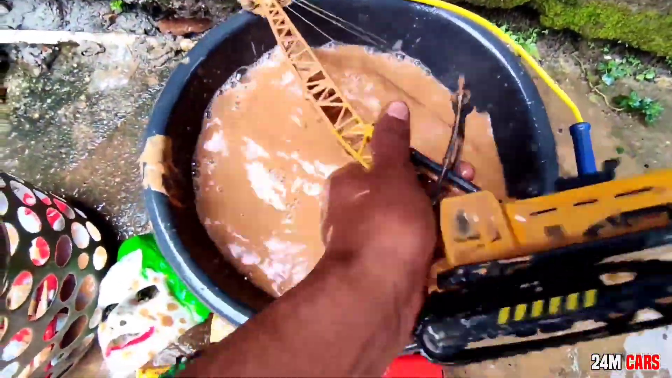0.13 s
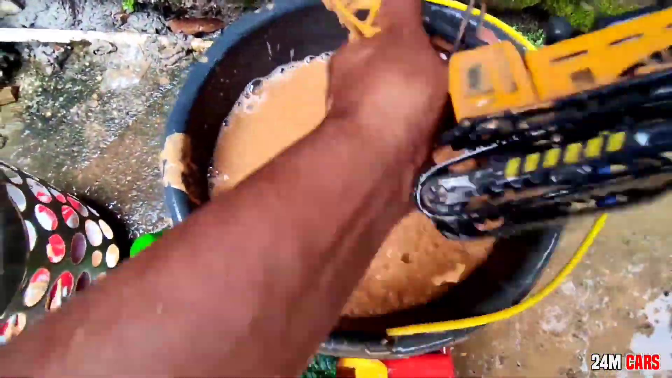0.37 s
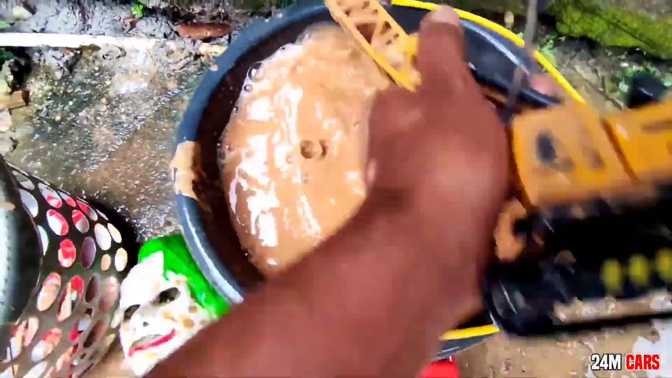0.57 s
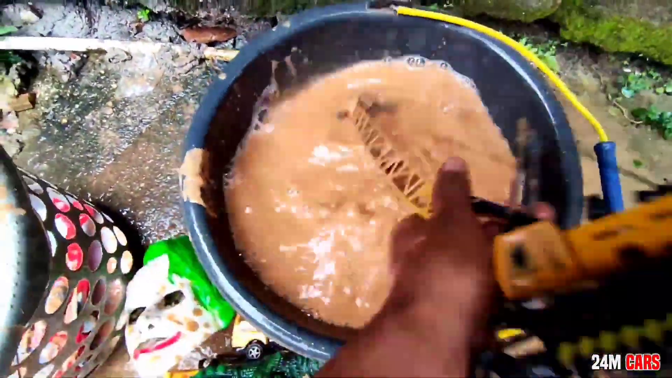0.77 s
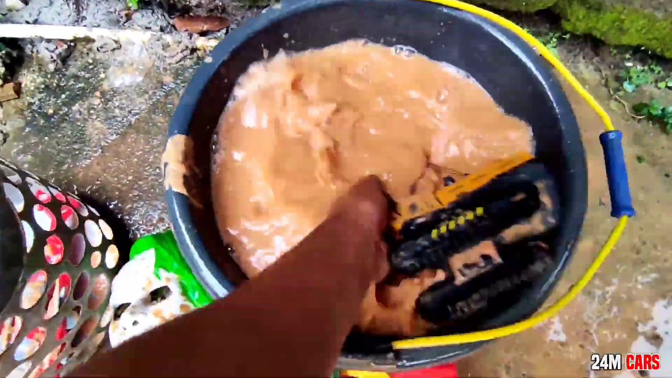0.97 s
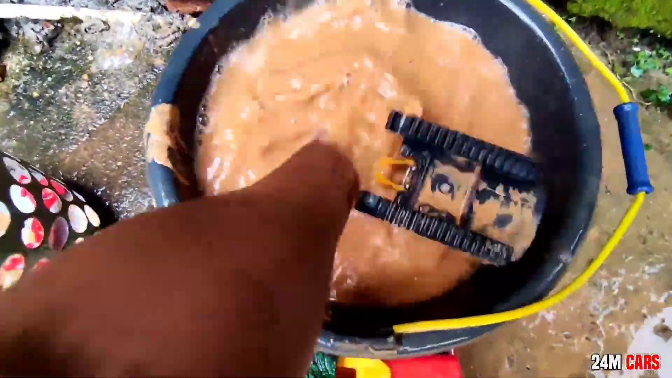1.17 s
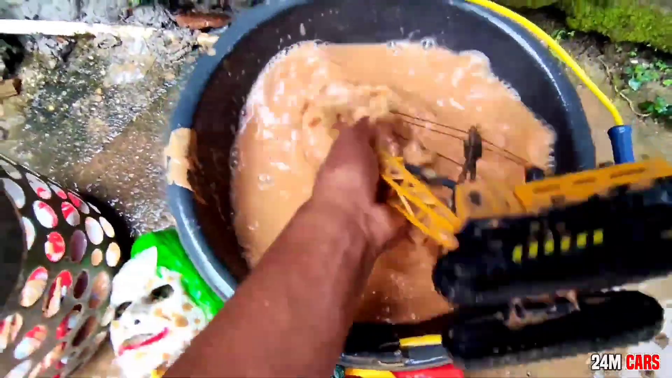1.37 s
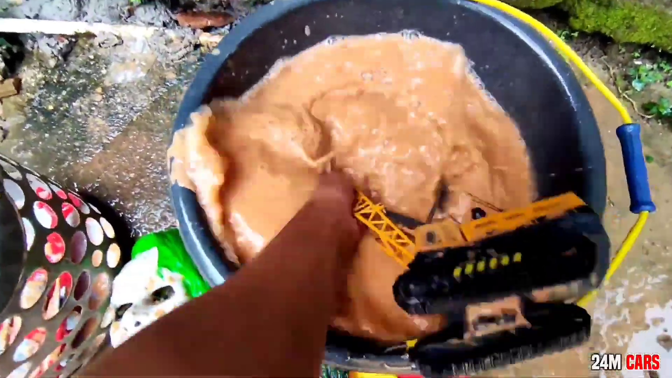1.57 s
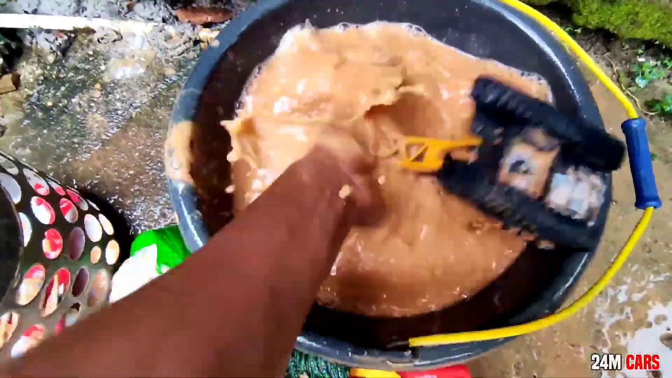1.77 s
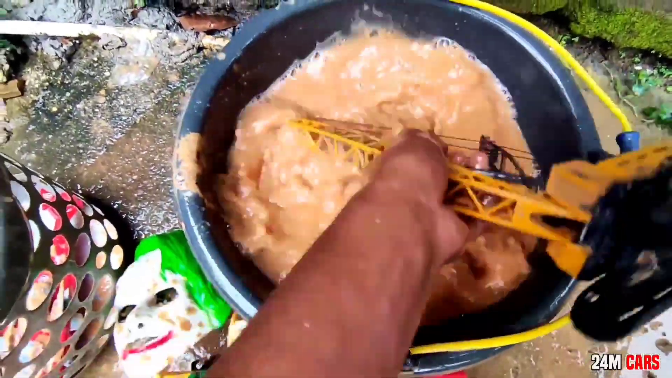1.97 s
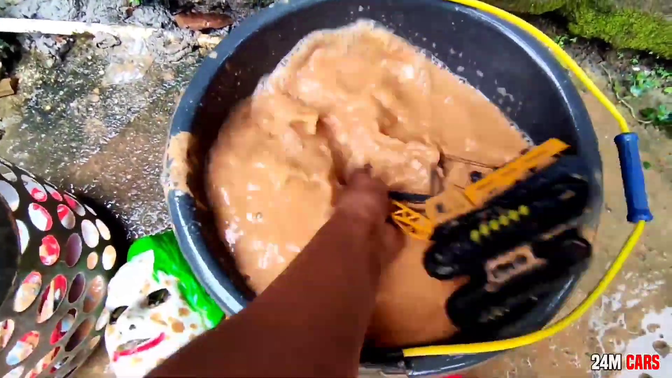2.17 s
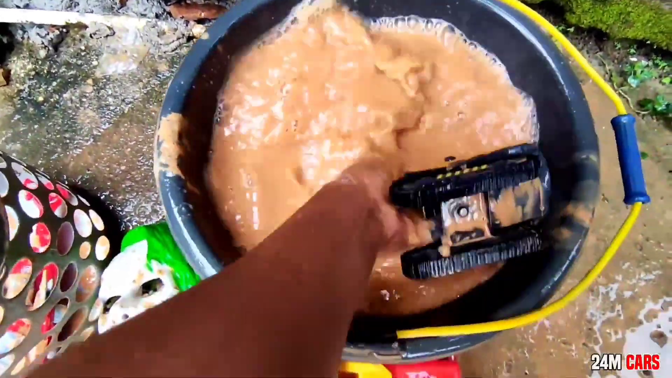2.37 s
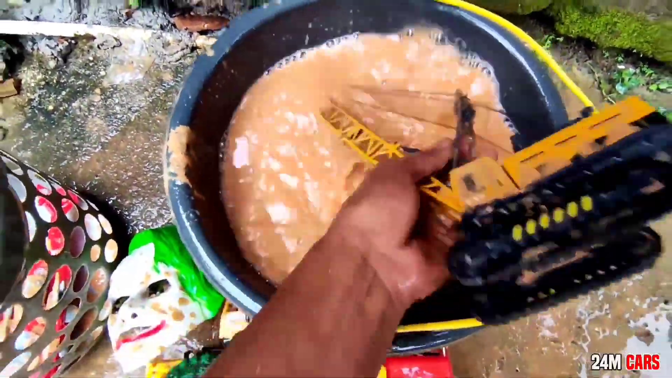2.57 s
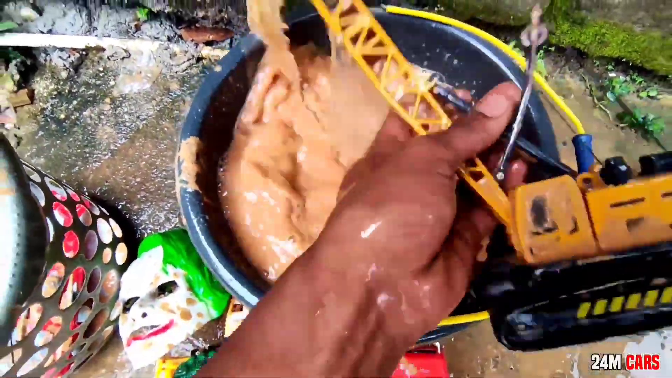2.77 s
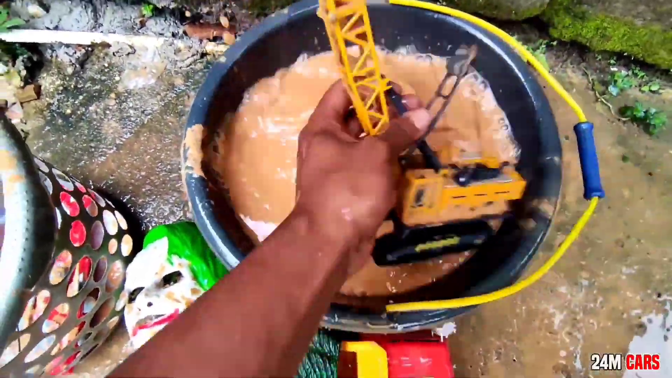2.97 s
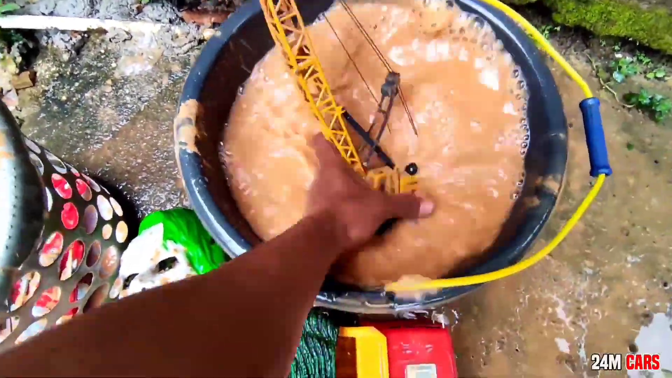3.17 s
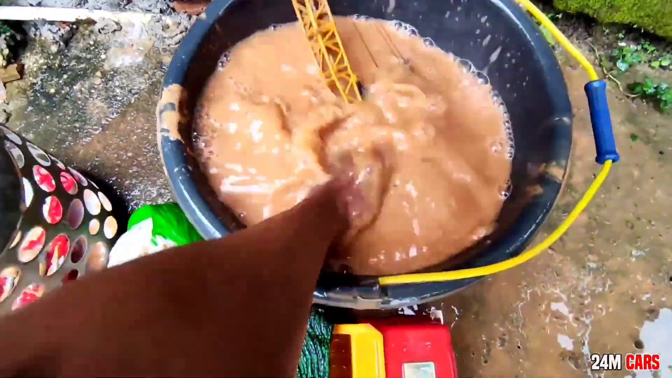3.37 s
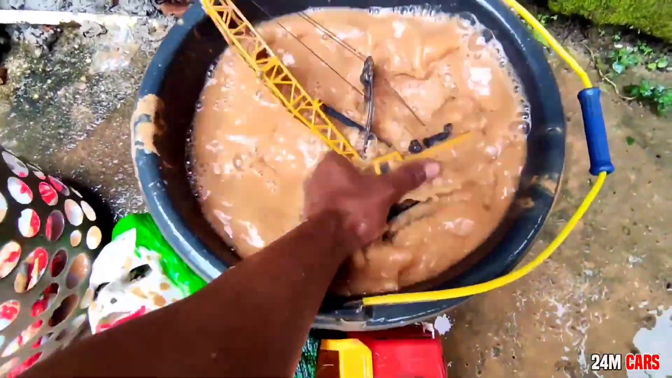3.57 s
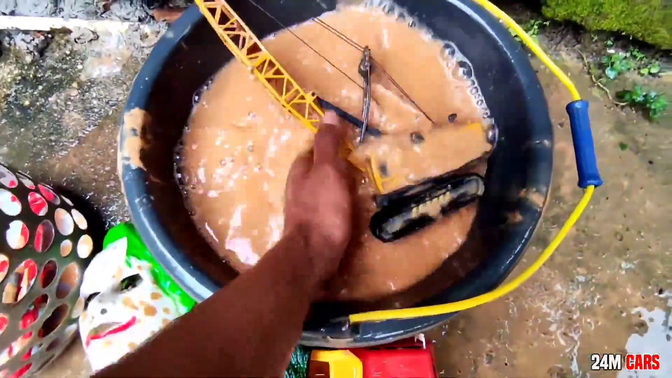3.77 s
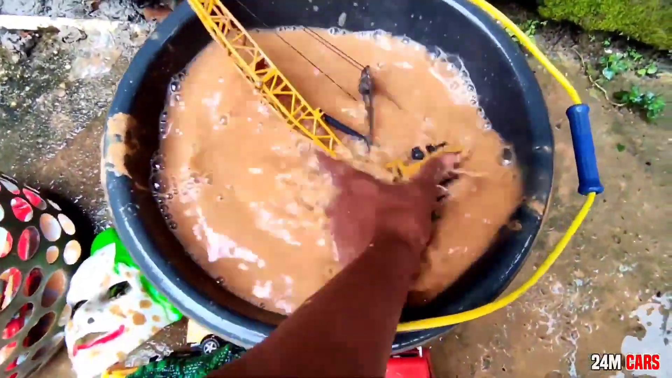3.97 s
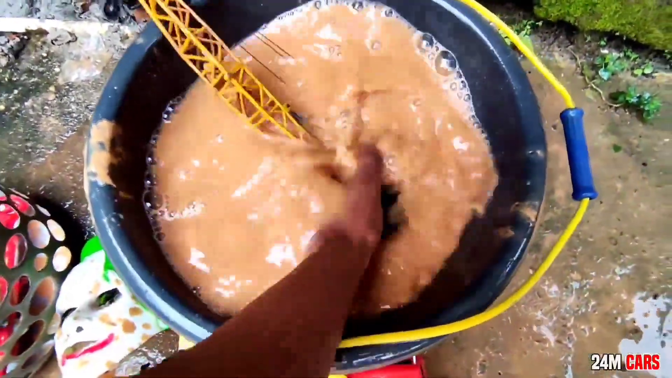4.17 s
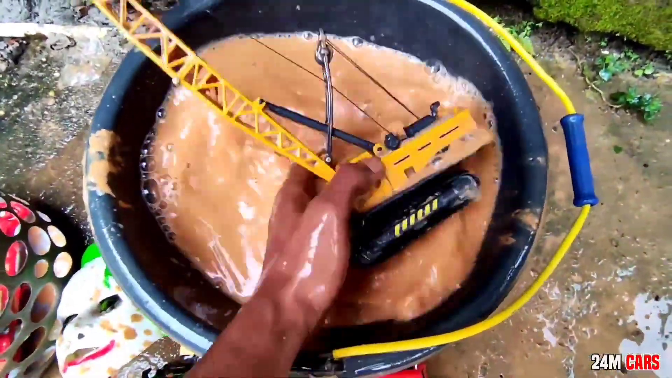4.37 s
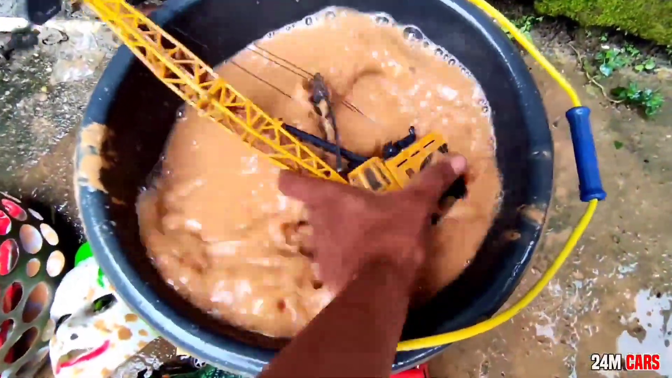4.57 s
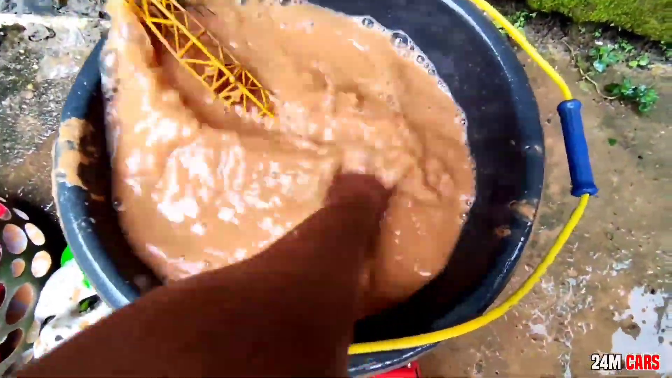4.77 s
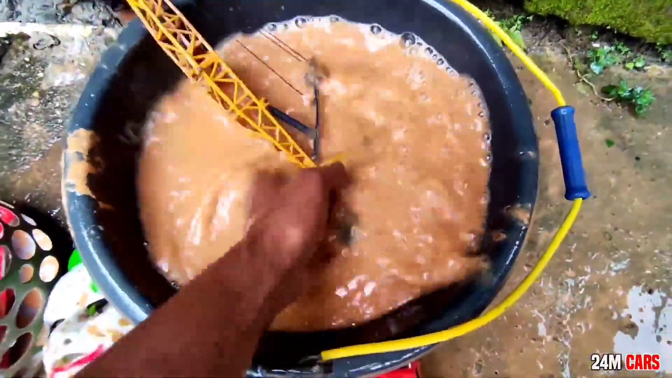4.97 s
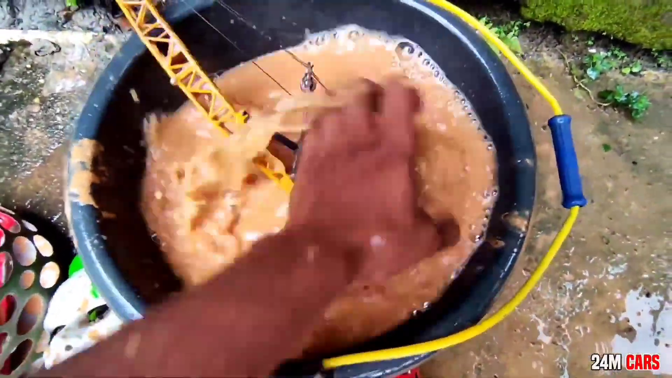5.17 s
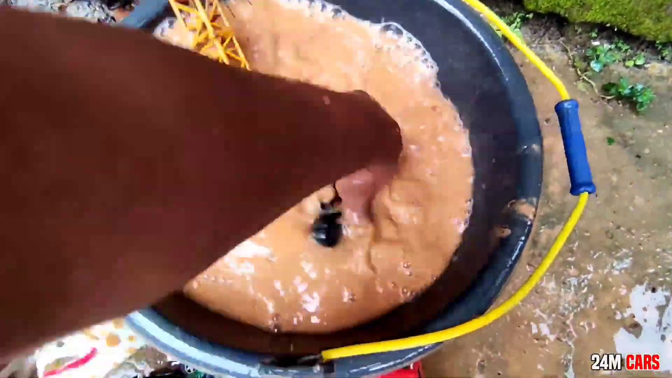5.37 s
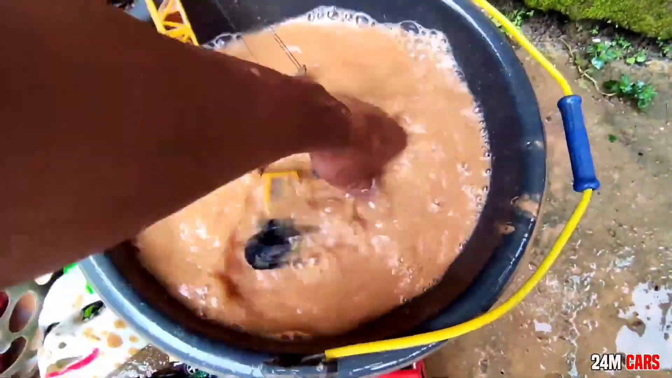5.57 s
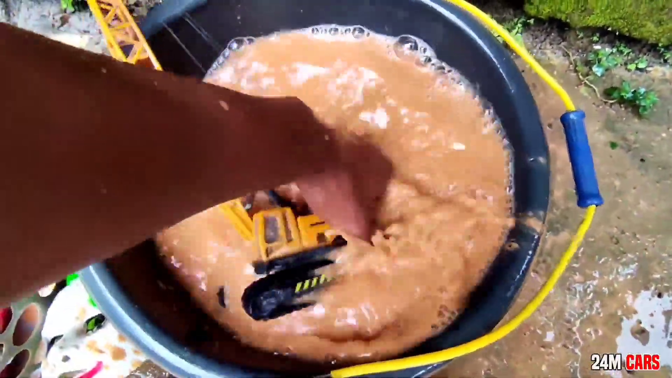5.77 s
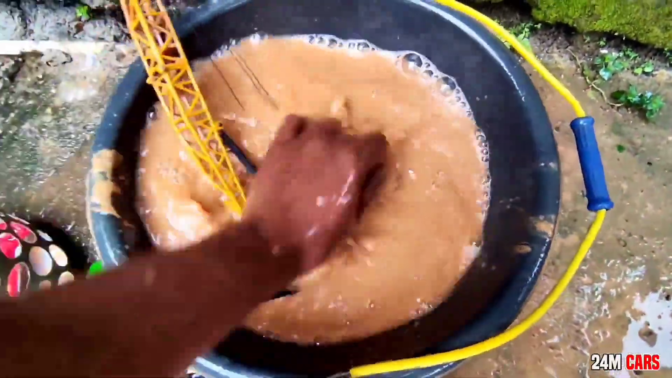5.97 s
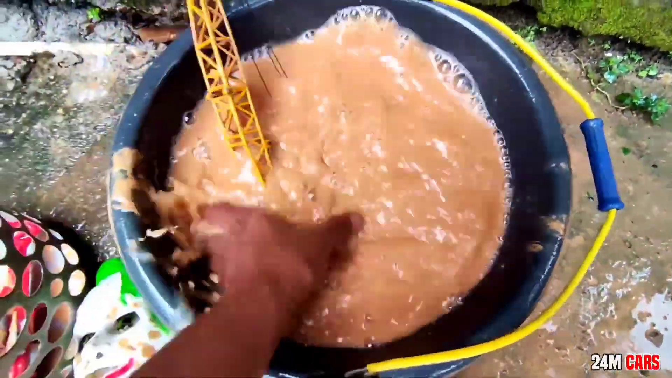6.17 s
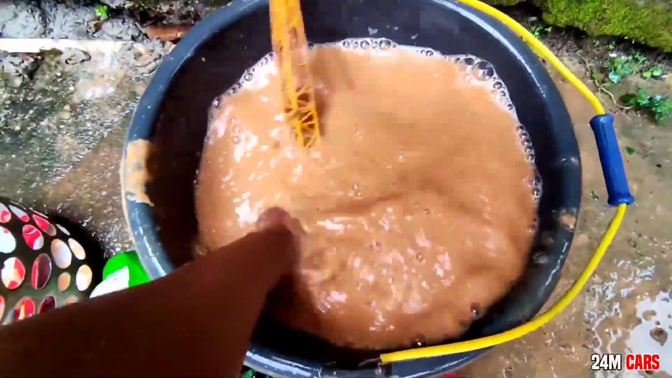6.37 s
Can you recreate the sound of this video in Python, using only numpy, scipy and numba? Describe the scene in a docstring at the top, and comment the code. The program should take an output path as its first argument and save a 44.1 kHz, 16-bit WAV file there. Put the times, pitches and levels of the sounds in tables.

```python
"""Faint sloshing and spray open over a distant rumble, as a hand swishes a plastic toy in a bucket of muddy water.
Knocks, plops, spits and slaps follow at once; singing bubbles come later. Two spaced microphones listen outdoors.
Bubbles and knocks are damped gliding sines; spray, slaps, slosh and distance are shaped stereo noise.
Surge envelopes drive the stirring; resonances and a short blur of noise add the bucket and its wet walls."""
import sys
import numpy as np
from scipy import signal
from scipy.fft import rfft, irfft, next_fast_len
from scipy.io import wavfile
from scipy.ndimage import uniform_filter1d, map_coordinates
from numba import njit

SR = 44100
rng = np.random.default_rng(int(sys.argv[2]) if len(sys.argv) > 2 else 0)


def materialize(psi):
    """Save the field psi as 16-bit PCM at rate SR to the path in sys.argv[1].

    A 1-D psi becomes a single channel; in a 2-D psi each row is a channel.
    """
    bounded = np.clip(np.atleast_2d(psi).T, -1, 1)
    quanta = np.round(bounded * 32767).astype(np.int16)
    wavfile.write(sys.argv[1], SR, quanta)


N = 283430  # length in samples


def amp(db):
    """Gain of a level in dB."""
    return 10 ** (np.asarray(db) / 20)


def unit(x):
    """Bring x to rms 1."""
    return x / np.sqrt(np.mean(x ** 2) + 1e-20)


def along(points, hz):
    """Read a curve of (Hz, value) points on a log frequency axis."""
    point_hz, value = np.transpose(points)
    return np.interp(np.log(hz + 1), np.log(point_hz + 1), value)


def curves(rows):
    """One value per sample for each column after the time."""
    time_s, *columns = np.transpose(rows)
    return [np.interp(np.arange(N) / SR, time_s, column) for column in columns]


def wobble(rate):
    """A smooth random curve with this many knots a second."""
    knots = rng.standard_normal(int(N * rate / SR) + 4)
    return map_coordinates(knots, [np.arange(N) * rate / SR])


def filtered(x, response):
    """Filter x by a response given as a function of frequency."""
    m = next_fast_len(N + SR // 2)
    return irfft(rfft(x, m) * response(np.fft.rfftfreq(m, 1 / SR)), m)[..., :N]


def rush(spectrum, alike, patchy_db):
    """Stereo noise of rms 1, with patches of random gain over time and frequency."""
    z = signal.stft(rng.standard_normal((2, N)), nperseg=256)[2]
    field = uniform_filter1d(rng.standard_normal(z.shape[1:]), size=5, axis=0)
    field = uniform_filter1d(field, size=9, axis=1)
    pair = signal.istft(z * amp(patchy_db * unit(field)), nperseg=256)[1][:, :N]

    def mid_side_response(hz):
        # this angle shares power between mid and side to give the wanted left-right likeness
        angle = np.arccos(np.clip(along(alike, hz), -1, 1)) / 2
        return amp(along(spectrum, hz)) * [np.cos(angle), np.sin(angle)]

    mid, side = filtered(pair, mid_side_response)
    return unit(np.array([mid + side, mid - side]))


@njit
def add(out, s, hz, cycles, gain, lag, rise, attack):
    """Add damped sines, 60 dB down at their end, whose pitch glides; each reaches the left lag seconds late."""
    for i in range(len(s)):
        life = cycles[i] / hz[i]
        for c in range(2):
            start = (s[i] + lag[i] * (.5 - c)) * SR
            for k in range(max(int(start) + 1, 0), min(int(start + life * SR), out.shape[1])):
                u = (k - start) / SR / life  # 0 to 1 over the life of the note
                shape = 10 ** (-3 * u) * (1 - np.exp(-u / attack)) ** 2
                out[c, k] += gain[c, i] * shape * np.sin(2 * np.pi * cycles[i] * u * (1 + rise[i] * u))


def bubbles(s, hz, cycles, db, rise, attack, spread_s, spread_db):
    """Bubbles scattered over the water, each with its own delay and balance between the microphones."""
    out = np.zeros((2, N))
    lag, pan = rng.standard_normal((len(s), 2)).T
    gain = amp(db + np.outer([.5, -.5], spread_db * pan))
    hz, cycles = np.clip(hz, 80, SR / 2.2), np.maximum(cycles, .5)
    add(out, s, hz, cycles, gain, .0001 + spread_s * lag, rise + 0 * s, max(attack, .002))
    return out


def swarm(count, centre_hz, octaves, cycles, scatter_db, clump_db, rise):
    """A random crowd of bubbles of rms 1, of unequal size, coming in clumps."""
    place, g = rng.random(count), rng.standard_normal((count, 4))
    db = scatter_db * g[:, 2] + clump_db * wobble(35)[(place * N).astype(int)]
    hz = centre_hz * 2 ** (octaves * np.clip(g[:, 0], -1.5, 3))
    life_cycles = cycles * 2 ** (0.64 * g[:, 1])
    crowd = bubbles(place * N / SR, hz, life_cycles, db, rise * (1 + g[:, 3]),
                    attack=0.037, spread_s=0.00018, spread_db=3.0)
    return unit(crowd)


def bursts(s, db, t60, attack_s):
    """Envelope of noise bursts that leap up and die away."""
    out, t = np.zeros(N + SR), np.arange(SR // 4) / SR
    for at, level, decay in zip(s, db, t60):
        fall = amp(level - 60 * t / max(decay, .003))
        out[round(at * SR):][:len(t)] += fall * (1 - np.exp(-t / attack_s)) ** 2
    return out[:N]


# Slow stirring between the surges. Each row: time in seconds, slosh gain in dB, spray gain in dB.
STIR_BED = [(0, -39, -42), (0.3, -46, -64), (0.47, -50, -53), (0.88, -60, -49), (1.3, -41.5, -43.5),
            (2.0, -38, -48), (2.6, -41, -47), (3.1, -54.5, -46.5), (3.5, -45, -62), (3.93, -54.5, -47.5),
            (4.4, -42.5, -45.5), (5.07, -43, -49), (5.32, -54, -55), (5.69, -43, -60), (5.9, -44.5, -38),
            (6.43, -38, -46.5)]
# Surges of water pushed by the hand. Each row: crest in seconds, length in seconds,
# slosh gain at the crest in dB, spray gain at the crest in dB.
SURGES = [(0.12, 0.43, -39.5, -32.5), (0.184, 0.088, -45, -27.5), (0.25, 0.096, -36, -27),
          (0.56, 0.34, -46, -40), (0.944, 0.072, -33.5, -32.5), (1.014, 0.078, -36, -22),
          (1.058, 0.19, -19.5, -23), (1.109, 0.11, -23, -43), (1.157, 0.085, -22, -42),
          (1.172, 0.09, -18.5, -22.5), (1.329, 0.084, -34.5, -64), (1.593, 0.15, -28, -26),
          (1.672, 0.032, -24, -45), (1.752, 0.056, -52, -19), (1.815, 0.032, -20.5, -38),
          (1.977, 0.14, -45, -26.5), (2.183, 0.59, -28, -35.5), (2.224, 0.071, -20.5, -25),
          (2.292, 0.089, -25.5, -36), (2.37, 0.14, -28, -23), (2.527, 0.059, -50, -34),
          (2.65, 0.13, -37, -35), (2.746, 0.15, -38, -34.5), (2.916, 0.36, -46, -38.5),
          (3.204, 0.095, -39, -22), (3.233, 0.18, -27.5, -21), (3.333, 0.17, -26, -20.5),
          (3.41, 0.11, -27.5, -50), (3.6, 0.48, -35.5, -37.5), (3.857, 0.11, -38, -41),
          (4.124, 0.22, -33.5, -35), (4.598, 0.06, -33.5, -31.5), (4.679, 0.12, -53, -28),
          (4.748, 0.17, -22.5, -23), (5.19, 0.14, -43.5, -28.5), (5.224, 0.083, -47, -43),
          (5.389, 0.18, -56, -27.5), (5.454, 0.23, -31, -36.5), (5.604, 0.089, -35, -34),
          (5.728, 0.052, -38, -38), (5.817, 0.045, -51, -37), (5.932, 0.044, -29, -41),
          (5.995, 0.14, -34.5, -30), (6.133, 0.042, -48, -25), (6.287, 0.088, -32.5, -21),
          (6.358, 0.084, -50, -23)]
SURGE_FALL_DB = 15.5  # a surge starts and ends this far under its crest
SURGE_RISE_SHARE = 0.4  # share of its length spent rising


def stirring():
    """Gains of slosh and spray: surges climb to a crest and ebb, their power adding to the slow stirring."""
    t = np.arange(N)[::32] / SR
    power = amp(2 * np.array(curves(STIR_BED))[:, ::32])
    for s, length, slosh_db, spray_db in SURGES:
        u = (t - s) / max(length, .02)
        away = np.where(u < 0, -u / SURGE_RISE_SHARE, u / (1 - SURGE_RISE_SHARE))
        power = power + np.outer(amp([2 * slosh_db, 2 * spray_db]), amp(-2 * SURGE_FALL_DB * away))
    return [np.interp(np.arange(N) / SR, t, np.sqrt(p)) for p in power]


# Colour of the sloshing water, also used by the slaps. Each row: frequency in Hz, relative level in dB per Hz.
SLOSH = [(88, -57), (150, 3), (182, -65), (243, -0.5), (333, -10), (426, 4), (569, -23), (699, 2),
         (2250, -10), (4000, -12.5), (5200, -26), (8800, -120)]
# Colour of the spray, also used by the spits. Each row: frequency in Hz, relative level in dB per Hz.
SPRAY = [(880, -29), (1500, -1.5), (2230, -15.5), (3220, -3), (4200, -3), (7170, -7.5), (8740, -2.5),
         (10000, -6.5), (12000, -5.5), (14800, -10.5), (16000, -24)]
# Stereo width of water and distant air. Each row: frequency in Hz, left-right likeness (1 is identical).
ALIKE = [(60, 0.95), (180, 1), (550, 0.99), (1650, 0.15), (4970, 0.015), (15000, 0.011)]


def churn():
    """Stirring makes gurgling bubbles on a slosh, and droplets of two sizes and short ticks on a spray."""
    slosh, spray = stirring()
    gurgle = swarm(count=5500, centre_hz=900, octaves=.8, cycles=14, scatter_db=3.5, clump_db=4, rise=0.2)
    drops = swarm(count=5000, centre_hz=3060, octaves=0.492, cycles=60,
                  scatter_db=3.5, clump_db=3.5, rise=0.044)
    fizz = swarm(count=7000, centre_hz=8130, octaves=0.56, cycles=30,
                 scatter_db=10.5, clump_db=9.0, rise=0.016)
    ticks = swarm(count=2500, centre_hz=3500, octaves=.9, cycles=8, scatter_db=4, clump_db=4, rise=0.05)
    wash = amp(1.5 * wobble(30)) * rush(SLOSH, ALIKE, patchy_db=4)
    hiss = amp(-4.5 + 3.8 * wobble(75)) * rush(SPRAY, ALIKE, patchy_db=3.5)
    low = amp(-3.5) * gurgle + amp(-5.5) * wash
    high = amp(-7.5) * drops + amp(-8.5) * fizz + amp(-10.0) * ticks + hiss
    return slosh * low + spray * high


# Swell of the distant rumble. Each row: time in seconds, level in dB before a random swell.
RUMBLE = [(0, -48), (1.5, -46), (3.5, -45.5), (5.35, -48), (5.55, -43.5), (5.95, -43.5), (6.43, -50)]
# Colour of the rumble. Each row: frequency in Hz, relative level in dB per Hz.
DRONE = [(15, -52), (25, -20), (97, 4), (182, -9.5), (241, -5.5), (300, -17), (390, -6), (660, -120)]
# Stereo width of the rumble. Each row: frequency in Hz, left-right likeness (1 is identical).
RUMBLE_ALIKE = [(30, .75), (70, .62), (150, .8)]
# Colour of the distant air. Each row: frequency in Hz, relative level in dB per Hz.
FAR = [(88, -21), (150, 3), (702, -15.5), (1100, -40), (4320, -20), (7180, -24), (8730, -13.5),
       (13400, -17), (16000, -21)]


def distance():
    """Low rumble and broad air from far off, each noise with a slow random swell."""
    swell_db = 1.5 * wobble(6)
    rumble = amp(curves(RUMBLE)[0] + swell_db) * rush(DRONE, RUMBLE_ALIKE, patchy_db=1.5)
    air = amp(-51.5 + 0.4 * wobble(1.87)) * rush(FAR, ALIKE, patchy_db=4.5)
    return rumble + air


# Resonances of the air space and wall. Each row: centre in Hz, width in Hz, relative peak gain in dB.
BUCKET = [(245, 40, 8), (430, 70, -3), (700, 80, -2.5), (950, 120, -8), (1420, 200, -7)]


def bucket(x):
    """The air above the water and the plastic wall ring on as damped resonances of alternating polarity."""
    def resonances(f):
        total = 0
        for k, (centre, width, db) in enumerate(BUCKET):
            mode = 1j * f * width / (centre * centre - f * f + 1j * f * width)
            total = total + (-1) ** k * amp(db) * mode
        return total

    return filtered(x, resonances)


def echoes(x, t60):
    """Sound bounces round the wet walls: a dense short blur that differs a little at each microphone."""
    t = np.arange(SR // 8) / SR
    common, own = rng.standard_normal(len(t)), rng.standard_normal((2, len(t)))
    tail = (common + 0.5 * own) * amp(-60 * t / max(t60, .01)) * (t > .0015)
    return signal.fftconvolve(x, tail / np.linalg.norm(tail[0]), axes=1)[:, :N]


# The toy knocking the wall and flat slaps. Each row: start in seconds, level in dB before the layer trims,
# first pitch in Hz, cycles at that pitch until 60 dB down.
KNOCKS = [(0.056, -19.5, 790, 6.3), (0.121, -22, 700, 6.2), (0.182, -22.5, 600, 3.8), (0.4821, 2, 987, 12),
          (1.0301, -11.5, 690, 12), (1.0798, 2, 906, 10.4), (1.145, -8, 1100, 9), (1.1615, -5, 760, 13),
          (1.5922, 5, 1050, 5.3), (1.671, -7, 970, 10.5), (1.796, -11.5, 940, 13),
          (1.9165, -5.5, 1005, 9.8), (2.146, -4, 1140, 8.4), (2.2045, -19, 645, 6), (2.213, -17, 620, 4.8),
          (2.236, -19, 620, 5), (2.275, -15, 600, 6.2), (2.411, -9, 1040, 9.8), (3.224, -12.5, 1010, 13),
          (3.281, -21, 680, 13), (3.305, -14, 694, 12), (3.382, -11.5, 870, 16), (3.4601, -13, 866, 10),
          (4.716, -12.5, 900, 7.7), (4.0875, -13, 1160, 16), (5.7113, -10, 875, 26),
          (6.1267, -13.5, 900, 13)]
KNOCK_SAG = 0.14  # share by which the mean pitch lies under the first
KNOCK_BODY_DB, KNOCK_EDGE_DB = -18.5, -22  # trims of the duller body and brighter edge


def knocks():
    """A sudden blow that sags in pitch, with a duller body under it and a brighter edge."""
    s, db, hz, cycles = np.transpose(KNOCKS)
    g = rng.standard_normal((len(s), 2))
    blow = bubbles(s, hz, cycles, db + 2.0, -KNOCK_SAG, attack=0.024, spread_s=.00004, spread_db=0.5)
    body_hz = hz * (0.502 + 0.071 * g[:, 0])
    body = bubbles(s + 0.0019, body_hz, 1.14 * cycles, db + KNOCK_BODY_DB, -KNOCK_SAG,
                   attack=0.024, spread_s=.00004, spread_db=10.0)
    edge_hz = hz * (1.6 + .1 * np.clip(g[:, 1], -1, 1))
    edge = bubbles(s, edge_hz, 1.1 * cycles, db + KNOCK_EDGE_DB, -KNOCK_SAG,
                   attack=0.02, spread_s=.00008, spread_db=1.5)
    return blow + body + edge


# Trapped air pockets ringing. Each row: loudest moment in seconds, level in dB before trim and flicker,
# pitch in Hz averaged over the first third of the ring.
PLOPS = [(0.073, -29, 790), (0.09, -24.5, 1770), (0.182, -26.5, 2180), (0.21, -30, 376), (0.222, -28, 2170),
         (0.256, -29.5, 613), (0.297, -25.5, 1930), (0.433, -18.5, 2210), (0.491, -15.5, 920),
         (0.596, -26.5, 2430), (1.005, -14, 725), (1.09, -6, 615), (1.099, -15.5, 770), (1.11, -16.5, 2400),
         (1.094, -13.5, 263), (1.167, -12, 790), (1.196, -12.5, 734), (1.166, -17, 398),
         (1.162, -12.5, 1610), (1.421, -27, 570), (1.459, -23.5, 1570), (1.46, -15, 766),
         (1.529, -23.5, 1510), (1.597, -13, 395), (1.608, -12.5, 463), (1.619, -18, 786), (1.682, -18, 724),
         (1.737, -12, 1670), (1.817, -15, 480), (1.824, -5.5, 760), (1.824, -16.5, 1290),
         (1.831, -21.5, 394), (2.156, -17.5, 970), (2.226, -20.5, 780), (2.257, -19, 730),
         (2.268, -11.5, 1700), (2.293, -17, 2000), (2.157, -21.5, 267), (2.216, -20, 330),
         (2.277, -13, 1340), (2.412, -15, 1570), (2.412, -14, 2630), (2.415, -18, 703), (2.421, -27.5, 363),
         (2.574, -14.5, 2650), (2.647, -24, 672), (2.657, -30, 3900), (3.011, -29, 947), (3.162, -21, 653),
         (3.178, -14, 1330), (3.198, -17.5, 1190), (3.199, -9, 534), (3.288, -24, 1350), (3.291, -18, 1910),
         (3.329, -14, 2730), (3.231, -16, 2840), (3.308, -19.5, 435), (3.328, -20.5, 1780),
         (3.39, -17, 260), (3.462, -22, 1610), (3.467, -25, 275), (3.571, -28, 1950), (3.574, -16.5, 868),
         (3.611, -28, 1140), (3.968, -22, 4070), (4.076, -25.5, 726), (4.09, -9, 1440),
         (4.092, -13.5, 5200), (4.099, -16.5, 3320), (4.106, -23.5, 1490), (4.143, -24.5, 770),
         (4.149, -18.5, 3530), (4.185, -27.5, 740), (4.234, -28, 1270), (4.256, -23.5, 3400),
         (4.559, -31, 1700), (4.399, -20.5, 1472), (4.518, -17.5, 1176), (4.532, -24, 1740),
         (4.594, -23.5, 634), (4.675, -16, 1290), (4.772, -19.5, 427), (4.819, -23, 755), (4.82, -22, 1190),
         (4.832, -18.5, 2640), (5.284, -26, 1840), (5.394, -23.5, 754), (5.431, -25, 480),
         (5.442, -25.5, 1370), (5.454, -27.5, 626), (5.463, -25.5, 1560), (5.476, -28, 685),
         (5.71, -19, 435), (5.727, -27, 913), (5.75, -29, 846), (5.816, -26.5, 794), (5.914, -21, 1710),
         (5.974, -19, 2010), (6.005, -25, 1050), (6.022, -16, 1840), (6.136, -20, 1790), (6.357, -18, 1100),
         (6.382, -19.5, 1850)]
PLOP_CYCLES = 2.843 * 4.27  # cycles until 60 dB down, for a plop of 0 dB at 800 Hz
HALVING_DB = 14  # half as many cycles per this many dB harder
PITCH_POWER = 0.36  # more cycles at higher pitch, above 800 Hz
DEEP_POWER = 0.95  # deeper pockets are damped by the mud and ring hardly longer than smaller ones
GLIDE, GLIDE_SCATTER = .07, .05  # relative pitch glide and its scatter, scaled below
HARD_DB, SAG_PER_DB = -6, .025  # above this level, each further dB takes this much off the glide


def plops():
    """Each pocket shuts fast and rings; a smaller neighbour at a near pitch beats with it, its skin shaking."""
    s, db, hz = np.transpose(PLOPS)
    pitch_power = np.where(hz < 800, DEEP_POWER, PITCH_POWER)
    life = PLOP_CYCLES * 2 ** (-db / HALVING_DB) * (hz / 800) ** pitch_power / hz
    glide = GLIDE + GLIDE_SCATTER * rng.standard_normal(len(s)) - SAG_PER_DB * np.maximum(db - HARD_DB, 0)
    rise, g = 1.15 * glide, rng.standard_normal((len(s), 2))
    start = s - 0.1046 * life  # so that the peak falls near the listed moment
    first_hz = hz / (1 + 0.31 * rise)
    pocket = bubbles(start, first_hz, life * hz, db + 0.5, rise, attack=0.021, spread_s=.00004, spread_db=0.5)
    late_s, near_hz = 0.0027 * g[:, 0] ** 2, first_hz * (1 + 0.12 * g[:, 1])
    neighbour = bubbles(start + late_s, near_hz, 0.72 * life * hz, db - 8, rise,
                        attack=0.027, spread_s=0.000075, spread_db=2.0)
    return (pocket + neighbour) * amp(1.67 * wobble(160))


# Water sheets and drops breaking up. Each row: time in seconds, level in dB before the layer trims,
# first droplet pitch in Hz, slap level relative to the spray in dB before its own trim.
SPITS = [(0.11, -14.5, 3420, 3), (0.261, -13.5, 8500, -1), (0.333, -19.5, 2890, -8),
         (0.43, -34.5, 3120, 18), (0.4797, -12.5, 3120, 16.5), (0.5, -16, 12900, -18),
         (0.5273, -14.5, 12900, -15), (0.59, -15, 2770, -7.5), (0.642, -22, 5180, -25),
         (0.7288, -24, 7950, -2), (0.832, -25, 2860, 3), (0.8686, -18.5, 11340, -3.5),
         (0.9108, -10.5, 8360, -20), (0.996, -12, 7060, -2), (1.005, -7, 8750, -17),
         (1.0365, -6, 8700, -10), (1.0783, -6, 3480, 6), (1.1086, -3.5, 9070, -20), (1.134, -11, 8320, -13),
         (1.162, -10, 4000, 11.5), (1.173, -4.5, 4250, -12), (1.185, -8, 4000, -18), (1.294, -20, 5000, 3),
         (1.5903, -1.5, 3250, 7), (1.6706, -8.5, 3400, 4), (1.735, -10, 4520, -14),
         (1.7562, -5.5, 3520, -23), (1.798, -27, 3570, 16), (1.914, -25, 3700, 14), (2.092, -19, 4000, 5),
         (2.147, -9, 4000, 8), (2.1632, -9, 4570, 4), (2.195, -15, 2960, -17), (2.291, -18, 3480, -12),
         (2.318, -10.5, 10300, -13), (2.347, -16, 3700, -7), (2.4101, -5, 3650, 6.5),
         (2.473, -25, 8500, -11), (2.571, -22, 3280, 12), (2.639, -22, 3720, 0), (2.9535, -23, 10700, -19),
         (3.006, -15.5, 3780, -5), (3.051, -16.5, 3760, -27), (3.092, -19.5, 7170, -3),
         (3.137, -11, 8600, 1), (3.182, -15, 10900, -13), (3.194, -3.5, 4160, -13),
         (3.2695, -9, 11500, -17), (3.288, -20, 6000, -6), (3.304, -13, 9000, 8), (3.316, -13, 8500, -14),
         (3.326, -4, 3850, -32), (3.383, -6.5, 8100, 1), (3.4583, -18, 6430, 3), (3.565, -13.5, 2550, 4.5),
         (3.609, -19, 8250, -6), (3.725, -25, 4600, 9.5), (4.0718, -16.5, 3460, 5.5),
         (4.0859, -5, 3100, -11), (4.094, -7, 9600, 0.5), (4.172, -15, 4240, -20), (4.1844, -15, 8170, -15),
         (4.353, -28, 2850, -19), (4.365, -15.5, 4240, -31), (4.532, -21, 3840, -16),
         (4.589, -17.5, 4230, 8.5), (4.657, -17, 9000, -20), (4.681, -13, 3400, -18), (4.731, -8, 6750, 0),
         (4.773, -3, 4730, -23), (4.788, -13, 5250, -15), (4.9128, -23, 3980, 9.5), (5.146, -21, 8300, -22),
         (5.152, -22, 4700, -19), (5.171, -14, 5730, -11), (5.212, -12.5, 10000, -16),
         (5.221, -12.5, 8900, -29), (5.239, -15, 6400, -24), (5.3762, -11, 3880, -23),
         (5.3913, -5, 8770, -20), (5.7076, -15.5, 8800, -2), (5.9134, -19.5, 9200, 6),
         (5.948, -5, 5000, -16), (6.0324, -12, 4870, -19), (6.129, -12, 4330, 4), (6.261, -4.5, 3930, -20),
         (6.299, -17, 2760, -5), (6.357, -5.5, 5400, -26), (6.41, -18, 3900, -24), (6.377, -13, 5300, -20)]
SPIT_T60_S = 0.023  # seconds for the hiss to fall 60 dB


def spits():
    """A hiss of spray with one droplet note on top and a duller, longer slap of water below."""
    s, db, hz, slap_db = np.transpose(SPITS)
    t60 = np.full(len(s), SPIT_T60_S)
    drops = bubbles(s, hz, 0.65 * t60 * hz, db - 3.5, rise=0.064,
                    attack=0.044, spread_s=0.00019, spread_db=-3.5)
    hiss = bursts(s - 0.0015, db + 0.5, t60, attack_s=0.0032) * rush(SPRAY, ALIKE, patchy_db=-3)
    slap_envelope = bursts(s, db + slap_db - 12.0, 1.55 * t60, attack_s=0.00085)
    slap = slap_envelope * rush(SLOSH, ALIKE, patchy_db=3.5)
    return drops + hiss + slap


# Free bubbles that sing on, most climbing as they near the surface. Each row: start in seconds,
# level in dB before trim and waver, first pitch in Hz, nominal ring in seconds until 60 dB down,
# share by which the mean pitch lies above the first (negative sags).
RISERS = [(1.03, -20, 1735, 0.1, 0.026), (1.18, -23.5, 649, 0.17, 0.13), (2.099, -9, 1010, 0.046, 0.004),
          (2.318, -20, 655, 0.044, 0.12), (2.342, -25, 2400, .07, .1), (2.36, -16, 1720, 0.064, 0.16),
          (4.117, -22, 1480, .03, 0.66), (4.206, -30, 1390, 0.05, 0.86), (2.915, -27.5, 767, 0.082, 0.046),
          (4.716, -23, 242, 0.088, .04), (4.743, -13, 699, 0.07, -0.11), (5.15, -29, 424, 0.16, 0.73),
          (5.498, -18, 735, 0.063, 0.053), (6.0, -21, 499, 0.071, 0.215), (6.294, -29.5, 607, 0.17, 0.4)]


def risers():
    """Singing bubbles, most climbing in pitch, whose level wavers as the water shakes them."""
    s, db, hz, ring, climb = np.transpose(RISERS)
    notes = bubbles(s, hz, ring * hz, db + 1.5, climb, attack=0.037, spread_s=.00008, spread_db=2.5)
    return notes * amp(3 * wobble(120))


def scene():
    """Water in the ringing bucket over the distant floor."""
    water = plops() + knocks() + risers() + spits() + churn()
    return water + amp(-13.5) * bucket(water) + amp(-10.0) * echoes(water, t60=0.093) + distance()


# The two microphones hear differently. Each row: frequency in Hz, left minus right in dB.
PORTS = [(60, 0.5), (130, -0.5), (290, -0.5), (640, -0.5), (1410, -2), (3100, 2), (6820, -2), (15000, 3.5)]
TOP_HZ = 16000  # band limit


def record(dry):
    """Unequal microphones, then peaks rounded off softly near full scale and a steep cut at the band limit."""
    heard = filtered(dry, lambda hz: amp(np.outer([.5, -.5], along(PORTS, hz))))
    rounded = heard / (1 + np.abs(heard) ** 8) ** (1 / 8)
    return filtered(rounded, lambda hz: hz < TOP_HZ)


dry = scene()
out = record(dry)
materialize(out)
```